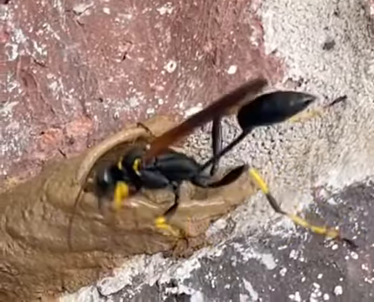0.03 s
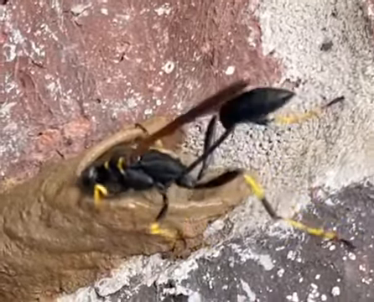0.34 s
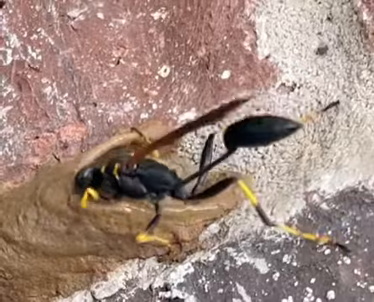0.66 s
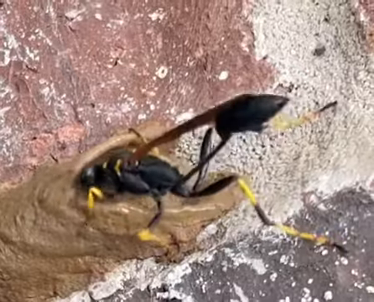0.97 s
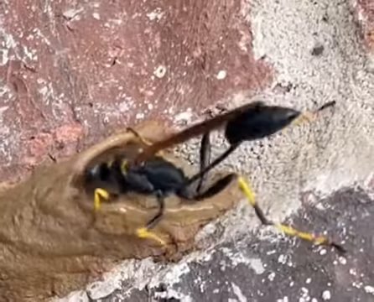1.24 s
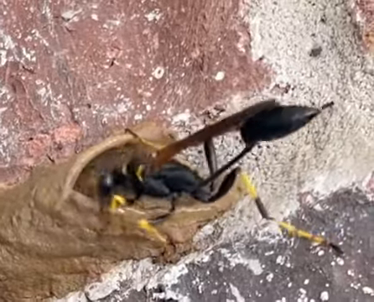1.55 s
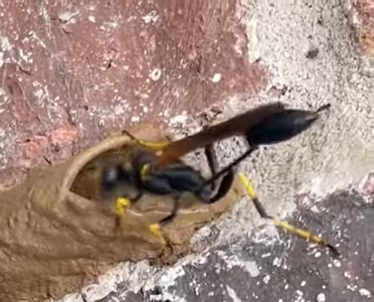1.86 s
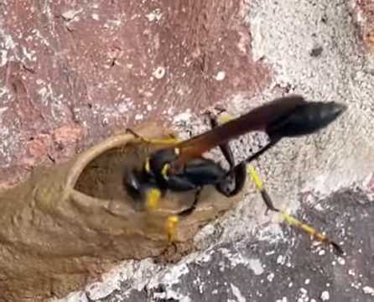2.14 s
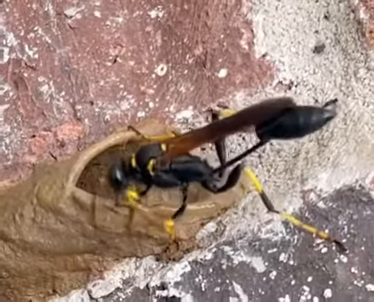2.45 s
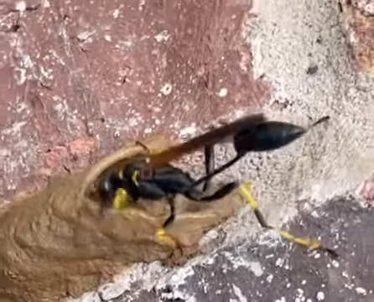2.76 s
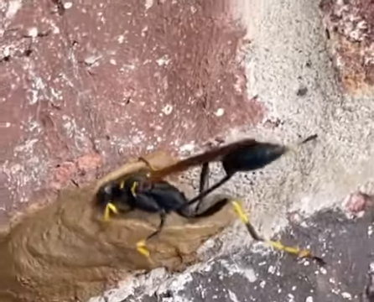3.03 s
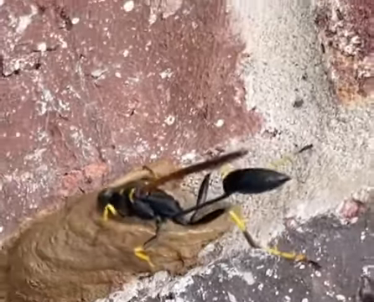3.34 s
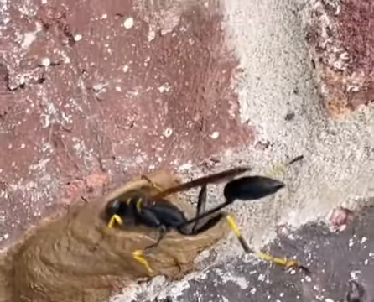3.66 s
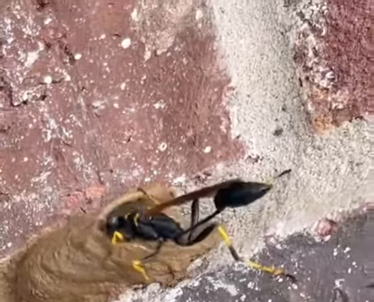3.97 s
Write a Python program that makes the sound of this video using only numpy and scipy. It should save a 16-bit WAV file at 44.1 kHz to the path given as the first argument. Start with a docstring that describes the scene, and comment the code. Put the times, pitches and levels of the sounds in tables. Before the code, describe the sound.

A wasp buzzes in short harsh bursts over shrill insects and a distant engine.

```python
"""A mud wasp works on its nest on an outdoor wall: from the start its flight muscles buzz in short
bursts and hammer its jaws against the mud. Two bands of insects shrill throughout, and a distant
engine drones over rumbling, hissing air. A high trill creeps in. Around two seconds the wasp's
bursts turn shorter, lower and brighter. Just before three seconds the engine's roar swells and
falls back; it rises again at the very end."""
import sys
import numpy as np
from scipy import signal
from scipy.fft import rfft, irfft
from scipy.io import wavfile
from scipy.ndimage import uniform_filter1d

SR = 44100
rng = np.random.default_rng(int(sys.argv[2]) if len(sys.argv) > 2 else 0)


def digitize_waveform(pressure):
    """Quantize a signal to 16-bit integers and store it at the path in sys.argv[1].

    Rows of a 2-D input are taken as channels; values are limited to [-1, 1].
    """
    field = np.atleast_2d(pressure).T
    bounded = np.clip(field, -1, 1)
    quanta = np.round(bounded * 32767).astype(np.int16)
    wavfile.write(sys.argv[1], SR, quanta)


N = 176400


def from_db(db):
    """Decibels to gain."""
    return 10 ** (np.asarray(db) / 20)


def unit_rms(x):
    """Scale to rms 1."""
    return x / np.sqrt(np.mean(x ** 2) + 1e-20)


def curve(points):
    """An automation curve, read at every sample."""
    time_s, value = np.transpose(points)
    return np.interp(np.arange(N) / SR, time_s, value)


def at_bins(points):
    """A curve over log frequency, read at every bin."""
    hz, value = np.transpose(points)
    return np.interp(np.log(np.fft.rfftfreq(N, 1 / SR) + 1), np.log(hz), value)


def drift(rate_hz):
    """Smooth random motion, mostly below the given rate; rms 1."""
    rolloff = (1 + (np.fft.rfftfreq(N, 1 / SR) / rate_hz) ** 2) ** 2
    return unit_rms(irfft(rfft(rng.standard_normal(N)) / rolloff, N))


def resonate(x, spectrum):
    """Ring a signal through a minimum-phase filter with the given spectrum."""
    cepstrum = irfft(np.log(from_db(at_bins(spectrum))), N)
    cepstrum[1:N // 2] *= 2
    cepstrum[N // 2 + 1:] = 0
    impulse = irfft(np.exp(rfft(cepstrum)), N)[:SR // 20]
    return signal.fftconvolve(x, impulse)[:N]


def moving_peak(x, centre_hz, q):
    """A resonance whose centre follows a curve."""
    out, state, block = np.zeros(N), [0., 0.], 128
    for i in range(0, N, block):
        peak = signal.iirpeak(centre_hz[i], q, fs=SR)
        out[i:i + block], state = signal.lfilter(*peak, x[i:i + block], zi=state)
    return out


def wide_noise(spectrum):
    """Stereo noise from all around; rms 1."""
    # how alike left and right are: frequency_hz, correlation
    likeness = [(60, 0.65), (160, 1), (300, 0.26), (600, 0.17), (1200, 0.29), (2500, 0.78), (8000, 1)]
    alike = np.clip(at_bins(likeness), -1, 1)
    mid, side = rfft(rng.standard_normal((2, N))) * from_db(at_bins(spectrum))
    return unit_rms(irfft(np.sqrt(1 + alike) * mid + np.sqrt(1 - alike) * side * [[1], [-1]], N))


def clicks(times_s, sizes):
    """Clicks placed between samples."""
    at = np.clip(times_s * SR, 0, N - 2)
    whole = at.astype(int)
    late = at - whole
    return np.bincount(whole, sizes * (1 - late), N) + np.bincount(whole + 1, sizes * late, N)


def flight_muscles():
    """Effort, pitch and brightness: each burst builds to a crest, holds and stops quickly."""
    # muscle bursts: start_s, length_s, attack_s, relative_level_db, relative_treble_db,
    # early_pitch_hz, middle_pitch_hz, late_pitch_hz
    bursts = [(-0.022, 0.13, 0.056, -60, -12.5, 304.6, 306.5, 311.5),
              (0.088, 0.13, 0.071, -58.5, -10, 307, 329, 310.3),
              (0.208, 0.14, 0.063, -58, -10.5, 310.8, 322.8, 315.7),
              (0.331, 0.16, 0.045, -60.0, -8, 333.6, 331.4, 324),
              (0.477, 0.09, 0.039, -65.5, -5.0, 289.5, 299, 304.3),
              (0.553, 0.14, 0.078, -60.5, -6, 319, 327.4, 328.8),
              (0.703, 0.12, 0.048, -58.0, -5.5, 313, 311.8, 297.4),
              (0.818, 0.14, 0.056, -57.5, -9, 330.0, 321.9, 333.3),
              (0.972, 0.11, 0.047, -57, -10, 312.6, 327, 292),
              (1.099, 0.12, 0.029, -61, -9, 280.0, 311.7, 271.4),
              (1.222, 0.12, 0.057, -58, -8, 303.5, 313.3, 319),
              (1.338, 0.137, 0.057, -60.0, -9.5, 286.8, 321, 313),
              (1.468, 0.12, 0.069, -57.5, -6.5, 308.8, 332.7, 309),
              (1.601, 0.1, 0.058, -58.0, -8.5, 302.4, 302.0, 297),
              (1.703, 0.11, 0.061, -59.5, -7.5, 292.0, 295.0, 285.0),
              (1.803, 0.099, 0.047, -61.0, -7, 266, 282.9, 290.0),
              (1.914, 0.09, 0.034, -60.0, -7, 326, 291.5, 261.3),
              (2.013, 0.06, 0.016, -64.5, -2.5, 300.8, 301.8, 264.3),
              (2.083, 0.059, 0.036, -59, -4.0, 266.7, 263, 250.3),
              (2.133, 0.067, 0.027, -64, -0.5, 320.6, 306.8, 292.8),
              (2.187, 0.082, 0.034, -64, -0.5, 271.2, 274.2, 271.8),
              (2.243, 0.097, 0.05, -61.5, -2.5, 290.7, 294.8, 265.1),
              (2.323, 0.092, 0.046, -59.5, -5.5, 305.8, 285.3, 249.7),
              (2.408, 0.11, 0.025, -63, -2, 303.5, 290.4, 298.5),
              (2.493, 0.1, 0.046, -59.5, -5.5, 325.0, 291, 266.6),
              (2.578, 0.1026, 0.0649, -57.5, -6.5, 313, 310.4, 313.6),
              (2.668, 0.13, 0.036, -61.0, -8.5, 303.8, 311.6, 317),
              (2.778, 0.11, 0.055, -59.0, -6.5, 321, 322.8, 314),
              (2.878, 0.13, 0.023, -62.5, -7.5, 299, 324.4, 300.4),
              (3.071, 0.06, 0.016, -58.5, -3.0, 305.0, 296, 298.8),
              (3.128, 0.12, 0.055, -60, -5.5, 317.7, 329, 312.0),
              (3.256, 0.12, 0.037, -65.5, -8.5, 281, 309.7, 295.0),
              (3.36, 0.1, 0.051, -60.5, -3.5, 282.6, 283, 286.6),
              (3.473, 0.1, 0.049, -59.0, -7.5, 289.7, 312.0, 280.3),
              (3.606, 0.089, 0.021, -59.0, -7, 290, 308, 311.6),
              (3.714, 0.11, 0.047, -61.0, -5, 284.2, 297.6, 288.0),
              (3.853, 0.067, 0.027, -60.0, -3, 317, 289.2, 272.5),
              (3.908, 0.095, 0.028, -61.5, -5, 297.7, 285.6, 281)]
    crest_db, crest_s, release_s, usual_treble_db = 3, .014, .025, -11
    t = np.arange(N) / SR
    effort, bright_db = np.zeros(N), np.zeros(N)
    pitch = np.full(N, bursts[0][-1], float)
    for start, length, attack, db, treble_db, early_hz, middle_hz, late_hz in bursts:
        age = t - start
        push_db = crest_db * np.exp(-((age - attack - crest_s / 2) / crest_s) ** 2)
        envelope = np.clip(age / attack, 0, 1) * np.clip((length - age) / release_s, 0, 1)
        level = from_db(db + push_db) * envelope
        leads = level > effort  # where bursts overlap, the stronger wins
        effort[leads], bright_db[leads] = level[leads], treble_db - usual_treble_db
        contour = [early_hz * 1.02, early_hz, middle_hz, late_hz, late_hz * .97]  # starts sharp, sags
        pitch[leads] = np.interp(age[leads] / length, [0, .2, .55, .9, 1], contour)
    return effort, pitch, bright_db


def jaw_taps(pitch, rough):
    """One tap on the mud per muscle stroke, with two loose rebounds and a puff of grit."""
    # bounces after each tap: delay_cycles, level_db
    rebounds = [(.27, -6.5), (.58, -7)]
    wobble, jitter_s, spread_db = .008, 8e-6, .7
    grit_db, grit_cycles = -15.5, .6
    t = np.arange(N) / SR
    cycles = np.cumsum(pitch * (1 + wobble * rough * drift(30))) / SR
    strokes = np.interp(np.arange(1, int(cycles[-1])), cycles, t)
    loose, period = np.interp(strokes, t, rough), np.interp(strokes, t, 1 / pitch)
    timing, force, *slips = loose * rng.standard_normal((SR // 20, 4))[:len(strokes)].T
    taps = clicks(strokes + jitter_s * timing, from_db(spread_db * force))
    for (delay, db), slip in zip(rebounds, slips):
        grip = np.interp(strokes, t, drift(12))  # the shifting grip slowly moves the bounce
        taps -= clicks(strokes + period * (delay + .035 * grip + .008 * slip), from_db(db))
    grit = unit_rms(rng.standard_normal(N) * np.exp(-(cycles % 1) / grit_cycles))
    low_cut = signal.butter(2, 200, "high", fs=SR, output="sos")
    return signal.sosfilt(low_cut, unit_rms(taps) + from_db(grit_db) * rough * grit)


def wasp():
    """The taps set wasp and mud ringing: a buzz with a moving rasp on top."""
    # resonances of the wasp on the mud: frequency_hz, relative_db
    body = [(250, 10), (620, -11.5), (950, 8), (1220, 2), (1560, 7), (1900, 1), (2260, 8.5), (2650, 2.5),
            (3100, -0.5), (3950, -1), (4350, -7), (5100, -10.5), (6500, -10.5), (11000, -28)]
    # a narrow ring that comes and goes as the wasp shifts: time_s, gain_db
    ring_db = [(0, 3.5), (1.7, 7.5), (2.05, -9), (2.5, -17), (2.8, -2), (4, 1)]
    # the rasp, moving with the wasp's grip: time_s, centre_hz
    rasp_hz = [(.7, 5270), (1, 6080), (1.55, 6200), (1.92, 5390), (2.03, 6490), (2.55, 6352), (2.9, 5240)]
    ring_hz, treble_hz, trim_db = 3830, 4250, -1.5
    effort, pitch, bright_db = flight_muscles()
    taps = jaw_taps(pitch, rough=from_db(.95 * bright_db))  # bright bursts rattle more
    buzz = resonate(taps, body)
    buzz += from_db(curve(ring_db)) * signal.lfilter(*signal.iirpeak(ring_hz, Q=16.4, fs=SR), buzz)
    buzz /= np.sqrt(np.maximum(uniform_filter1d(buzz ** 2, size=1300), 1e-6))  # even out the level
    treble = signal.sosfiltfilt(signal.butter(4, treble_hz, "high", fs=SR, output="sos"), buzz)
    rasp = from_db(.5) * moving_peak(treble, curve(rasp_hz), q=3.3) + from_db(-6) * treble
    flutter_db = .7 * drift(70)
    return (buzz - treble + from_db(bright_db) * rasp) * effort * from_db(trim_db + flutter_db)


def wall(x, level_db=-20, t60_s=.05):
    """A brief scatter from the wall, different on each side."""
    t = np.arange(SR // 10) / SR
    scatter = rng.standard_normal((2, len(t))) * from_db(-60 * t / t60_s)
    scatter /= np.linalg.norm(scatter[0])
    return from_db(level_db) * signal.fftconvolve(x[None], scatter)[:, :N]


def shrill(spectrum, lag_s):
    """Many far insects merge into a flickering band that reaches the left side first."""
    band = irfft(rfft(rng.standard_normal(N)) * from_db(at_bins(spectrum)), N)
    flicker_db = .86 * drift(170)
    left = rfft(band * from_db(flicker_db))
    right = left * np.exp(-2j * np.pi * np.fft.rfftfreq(N, 1 / SR) * lag_s)
    return unit_rms(irfft([left, right], N))


def insect_chorus():
    """Two steady bands of shrilling, one above the other."""
    # colour of each band: frequency_hz, relative_db
    low_band = [(6700, -44), (7250, -14), (7800, -10.5), (8200, -0.5), (8600, 0.5), (8900, -2), (9300, -17),
                (10100, -51)]
    high_band = [(8200, -72), (9100, -4), (9950, 14), (10300, -1), (10900, 11), (11600, -38)]
    low = from_db(-60.5) * shrill(low_band, lag_s=.000117)
    high = from_db(-62) * shrill(high_band, lag_s=.000245)
    return low + high


def open_air():
    """The outdoor bed: a low rumble, a steady wash of air and a faint hiss."""
    # colour of each layer: frequency_hz, relative_db
    rumble = [(20, -42), (38, -24), (52, -4), (105, -4), (130, -11.5), (190, -14), (260, -77)]
    air = [(30, -35), (100, -5), (220, 1.5), (350, 0), (480, -6), (950, -11.5), (1550, -15), (2200, -25),
           (6000, -63)]
    hiss = [(900, -30), (2300, 0), (4500, -7), (6500, -6), (12000, -25)]
    # fader rides: time_s, level_db
    rumble_db = [(0, -49.5), (1.1, -47.5), (2.5, -48), (3.2, -48), (4, -50.5)]
    hiss_db = [(0, -66), (.55, -66), (1.2, -70), (2.7, -67), (3.04, -76), (3.2, -73)]
    return (from_db(curve(rumble_db)) * wide_noise(rumble)
            + from_db(-57.5) * wide_noise(air)
            + from_db(curve(hiss_db)) * wide_noise(hiss))


def engine():
    """Harmonics of the firing rate waver on their way through the air; a roar swells behind them."""
    # firing rate: time_s, rate_hz
    firing_hz = [(0, 83.56), (.8, 81.86), (1.3, 83.38), (2, 83.02), (4, 82.5)]
    # strong partials: harmonic, trim_db, left_minus_right_db
    main_partials = [(1, -0.5, -1.5), (2, 0, -1.6), (4, 1, -5), (5, -5.5, -15)]
    # their fader rides, ahead of the trim: time_s, level_db
    first_db = [(0, -42.5), (.15, -48.5), (.35, -40.5), (.6, -44), (.8, -41), (1.3, -41.5), (1.5, -47),
                (1.95, -43.5), (2.45, -43.5), (2.8, -50), (3.5, -55), (4, -52)]
    second_db = [(0, -51), (.3, -61), (.58, -58), (.78, -46), (1.1, -49), (1.251, -43), (1.5, -43),
                 (1.85, -47.5), (2.2, -41.5), (2.55, -38.5), (3.1, -39), (3.35, -43.5), (3.7, -44.5),
                 (4, -40)]
    fourth_db = [(0, -65), (.35, -64), (.7, -70.5), (1.8, -65.5), (2.3, -59), (2.62, -55), (3.2, -62),
                 (3.7, -68), (4, -57)]
    fifth_db = [(0, -59.5), (2.3, -60), (3.7, -62), (4, -54.5)]
    # faint, steady partials: harmonic, level_db, left_minus_right_db
    weak_partials = [(3, -68, 2), (7, -74, -3.5), (8, -75.5, 7)]
    # colour of the roar: frequency_hz, relative_db
    roar = [(40, -54), (150, -10), (320, 3), (900, -3), (1150, -16), (1450, -6), (2100, -34.5)]
    # swells of the roar: time_s, level_db
    roar_db = [(0, -61.5), (1.6, -66.5), (1.84, -59), (2.05, -76.5), (2.58, -57), (2.68, -58),
               (2.77, -52.5), (2.88, -51), (3.05, -60), (3.3, -66.5), (3.88, -64.5), (4, -50.5)]
    flutter_db, roar_pan_db, wander_rad = 2.2, 1.5, .067
    sides = np.array([[1], [-1]])
    phase = 2 * np.pi * np.cumsum(curve(firing_hz)) / SR
    rides = first_db, second_db, fourth_db, fifth_db
    main = [(k, curve(ride) + trim, pan) for (k, trim, pan), ride in zip(main_partials, rides)]
    out = from_db(curve(roar_db) + flutter_db * drift(31) + sides * roar_pan_db / 2) * wide_noise(roar)
    for harmonic, db, pan_db in main + weak_partials:
        heard = phase + wander_rad * (drift(7.8) + drift(1) * sides)  # quick waver, slow stereo sway
        tone = np.sqrt(2) * np.sin(harmonic * heard + rng.uniform(0, 2 * np.pi))
        out += from_db(db + sides * pan_db / 2) * tone
    return out


def trill(strokes_per_s=72.5, band_hz=(10650, 11350)):
    """One nearer insect, a little to the right: a high narrow band, pulsed once per wing stroke."""
    # slow fade-in, ahead of the pan: time_s, level_db
    trill_db = [(0, -81), (1.6, -73), (3, -70), (4, -73)]
    stroke = (.5 + .5 * np.cos(2 * np.pi * strokes_per_s * np.arange(N) / SR)) ** 2
    pulses = rng.standard_normal(N) * (stroke + .2)
    band = signal.sosfilt(signal.butter(4, band_hz, "band", fs=SR, output="sos"), pulses)
    return from_db(curve(trill_db)) * unit_rms(band) * from_db([[-2], [2]])


def scene():
    """The wasp close up against its wall, the rest farther away."""
    buzz = wasp()
    background = insect_chorus() + trill() + open_air()
    return buzz + wall(buzz) + background + engine()


def record(dry, cutoff_hz=11500):
    """A steep high cut on the whole mix."""
    return signal.sosfilt(signal.ellip(10, .2, 80, cutoff_hz, fs=SR, output="sos"), dry)


dry = scene()
out = record(dry)
digitize_waveform(out)
```